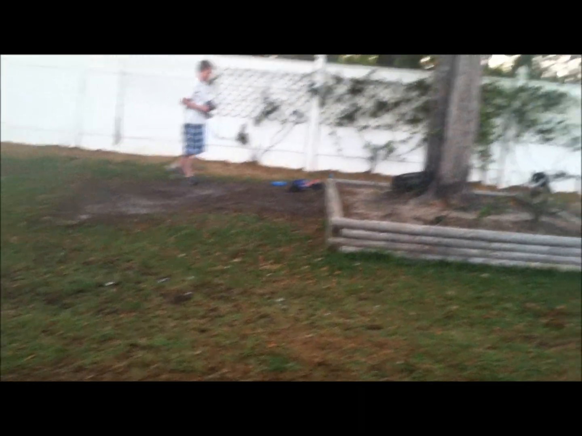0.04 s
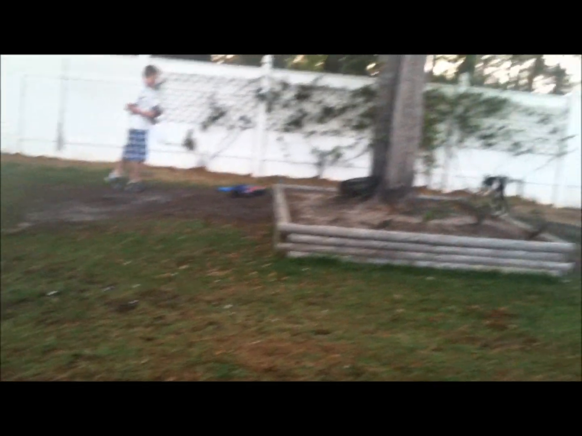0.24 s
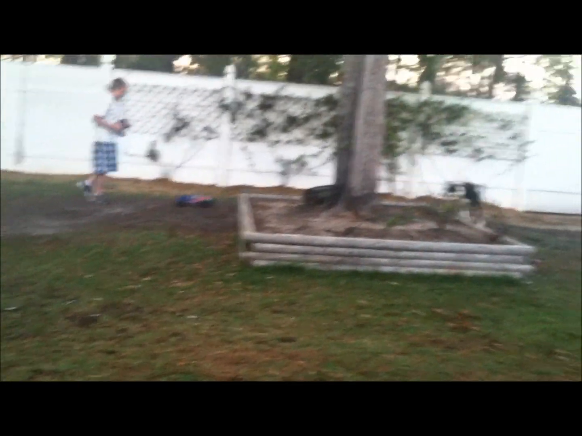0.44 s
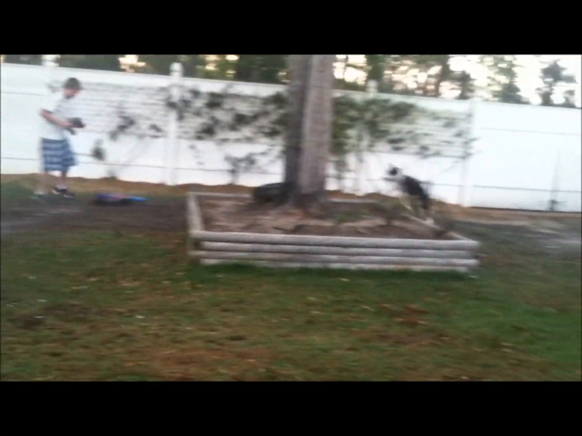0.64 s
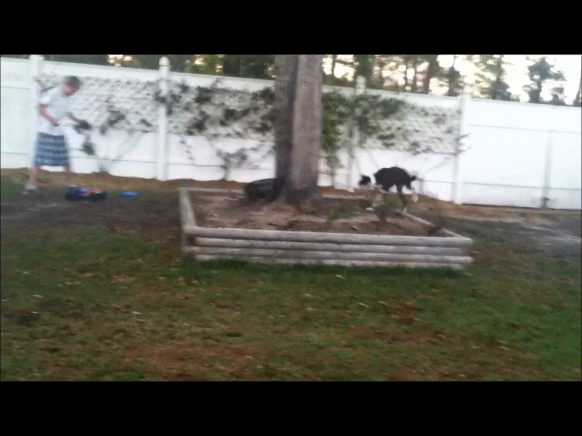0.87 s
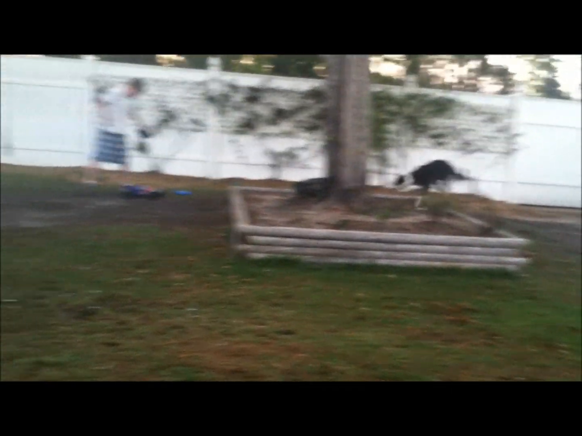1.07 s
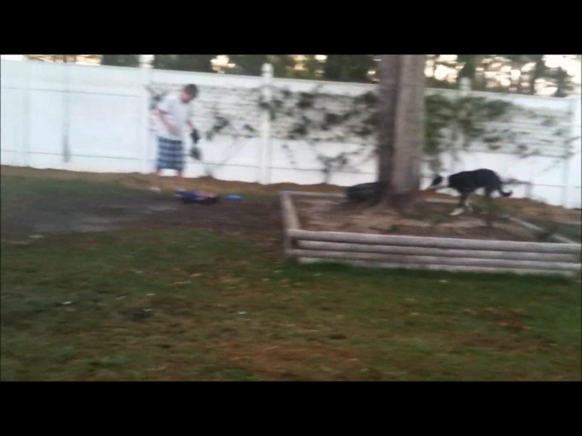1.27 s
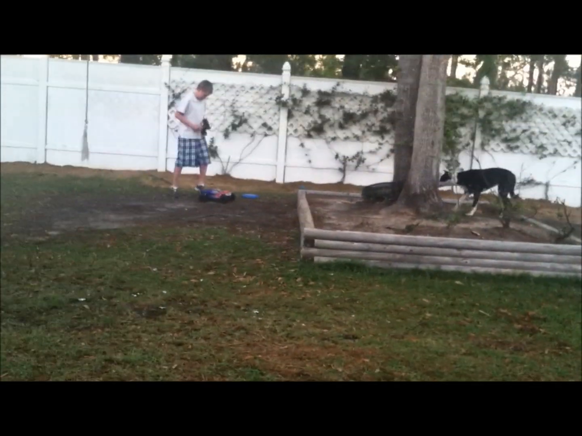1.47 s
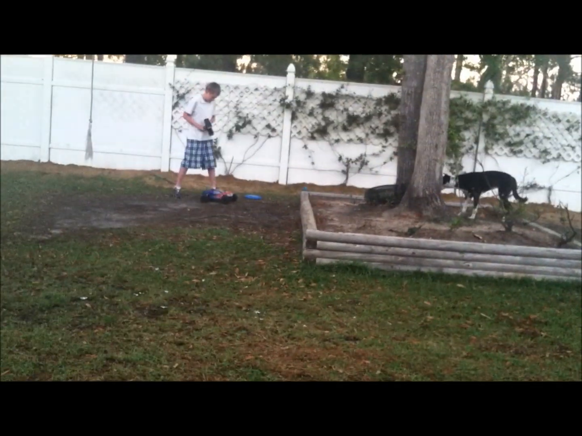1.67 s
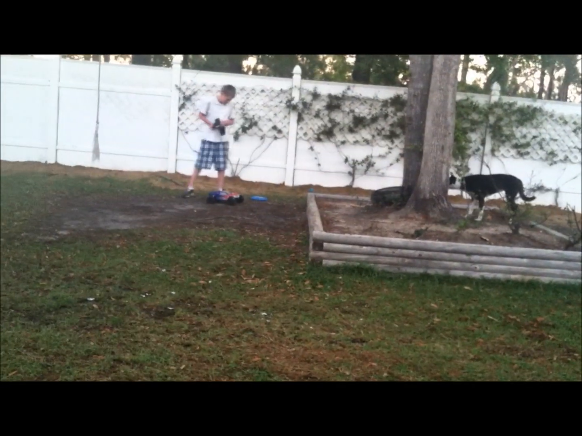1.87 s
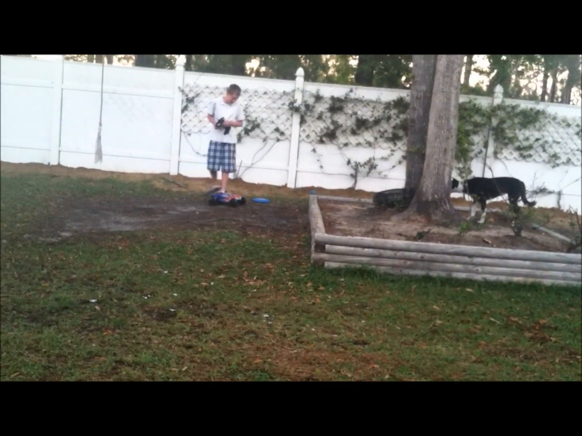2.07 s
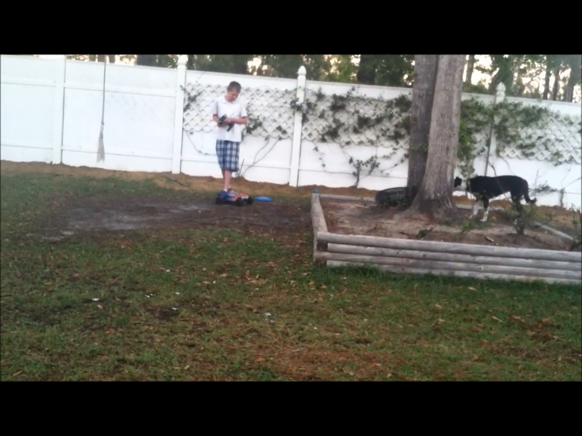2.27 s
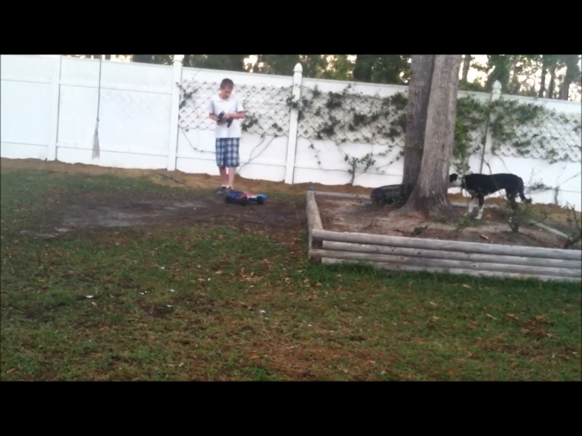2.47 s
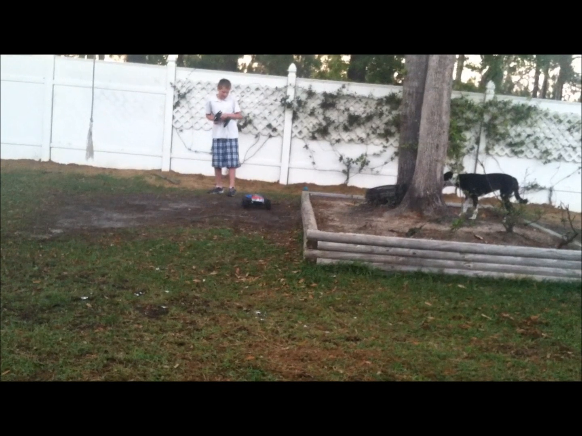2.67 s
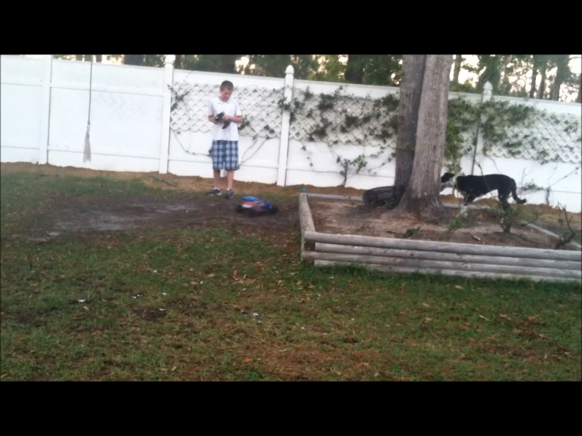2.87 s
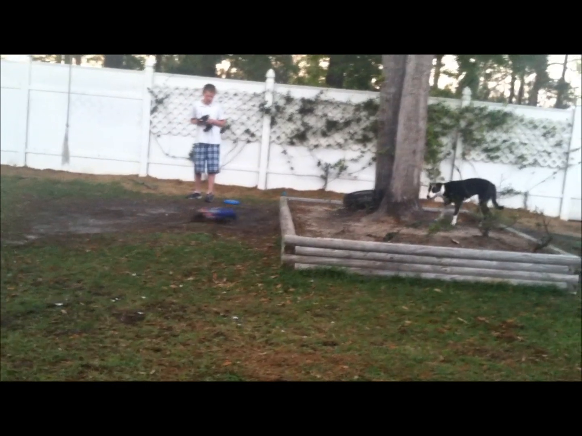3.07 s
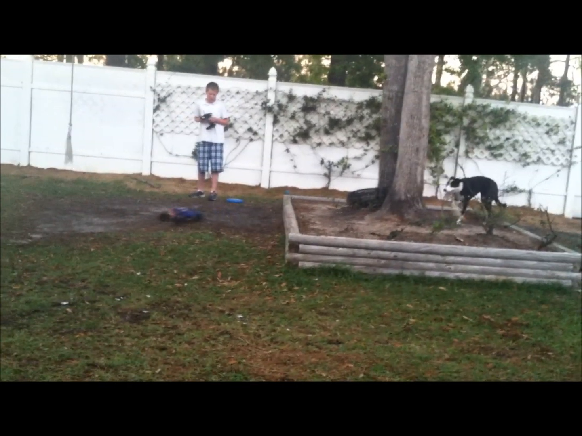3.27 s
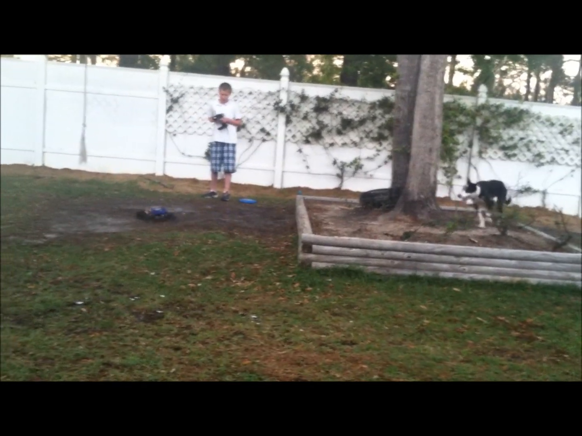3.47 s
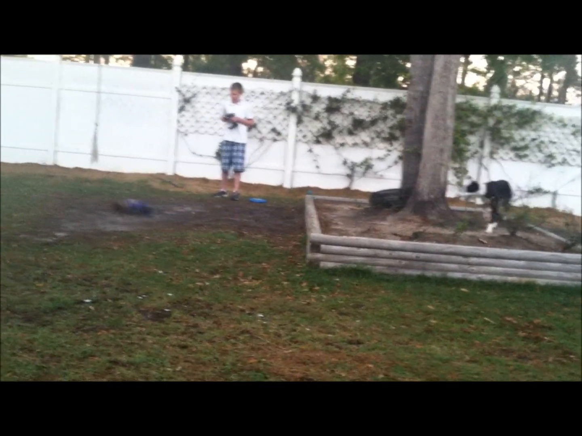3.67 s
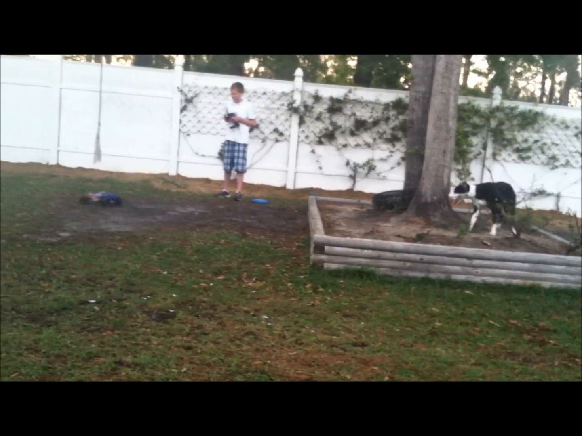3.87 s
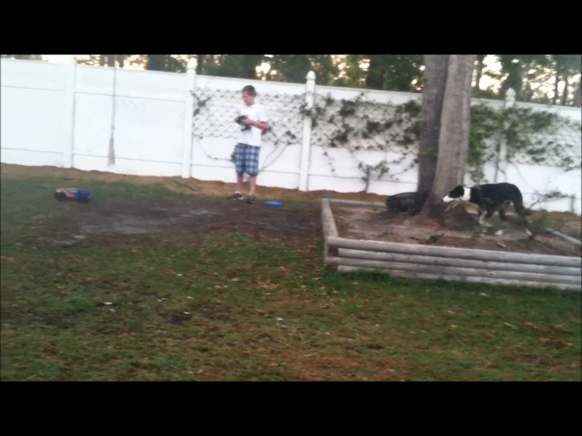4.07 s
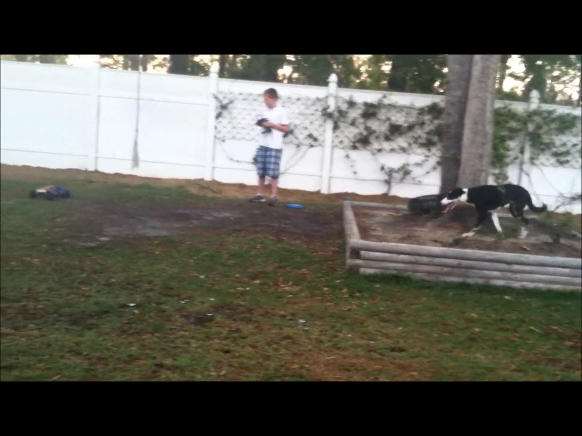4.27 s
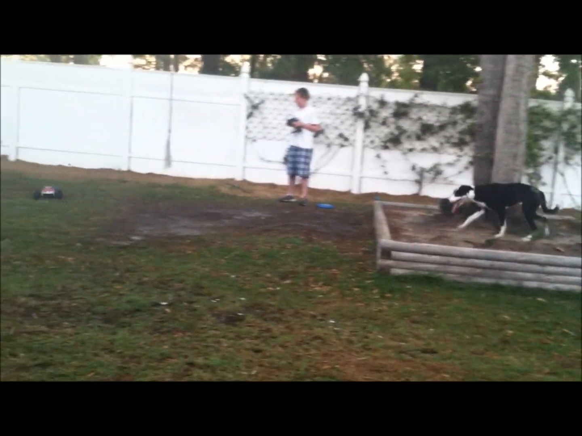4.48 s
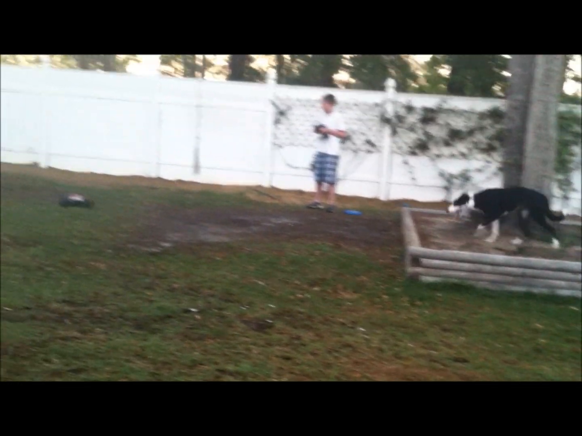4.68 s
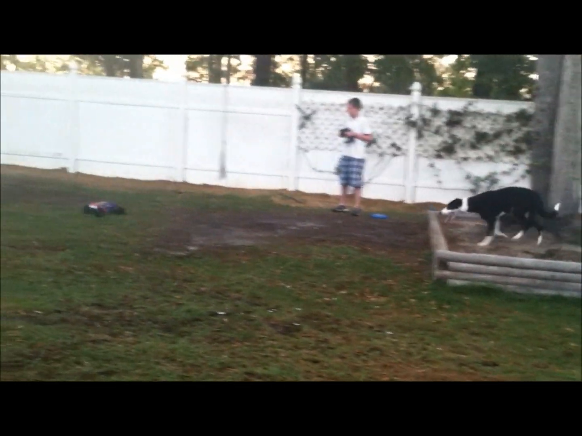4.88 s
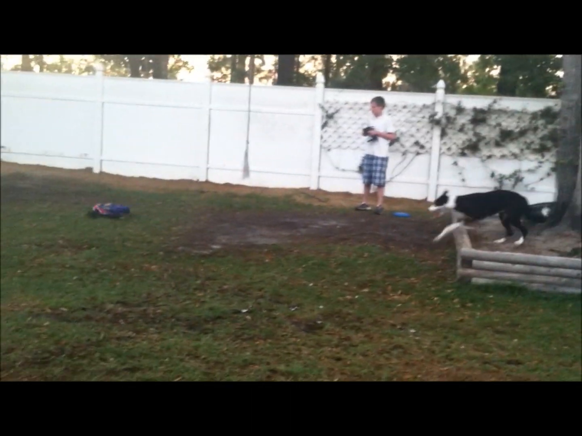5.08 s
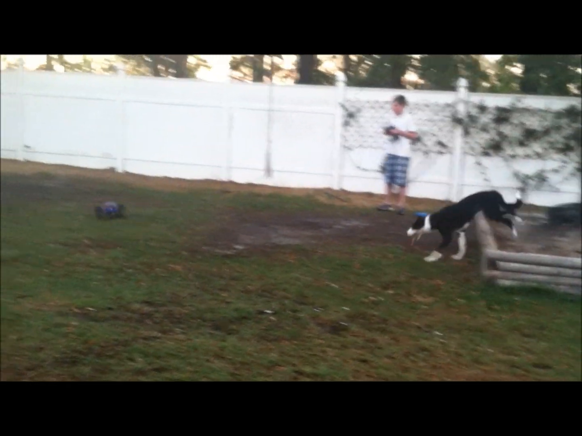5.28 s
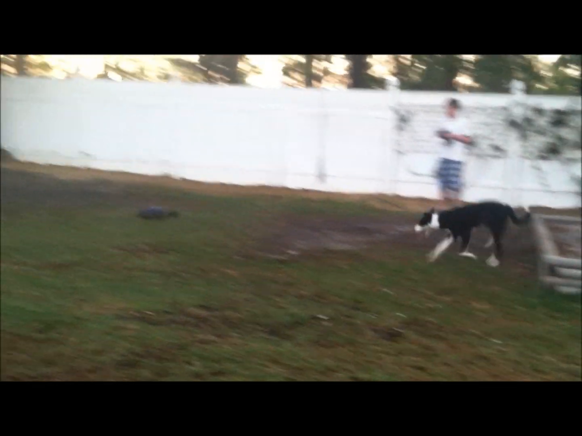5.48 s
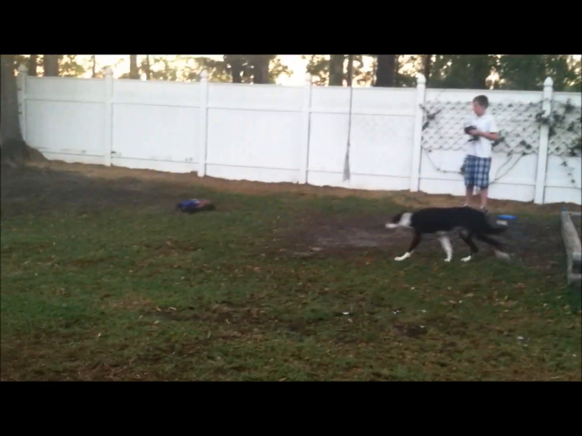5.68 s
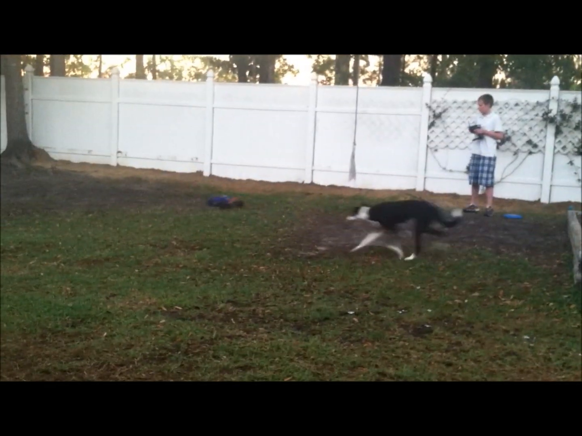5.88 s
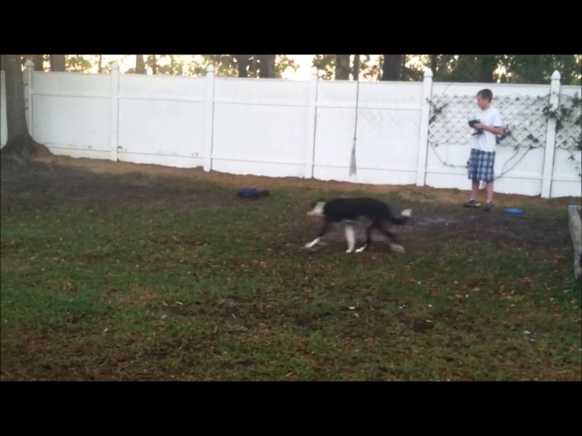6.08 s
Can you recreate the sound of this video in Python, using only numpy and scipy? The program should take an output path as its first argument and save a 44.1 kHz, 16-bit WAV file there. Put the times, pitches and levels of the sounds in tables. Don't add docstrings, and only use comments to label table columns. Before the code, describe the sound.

A toy radio-controlled car drives over turf, heard from a few metres by a single small microphone, centred and dry. Two quick motor bursts come first, rough then higher, followed by about a second of near quiet with soft grass rustles, ticks and distant traffic drone. Then a long gritty run fills the rest: buzzy gear whine, plastic rattle, small thuds and faint squeaks, its hollow tone shifting with each turn, still going at the end.

```python
import sys
import numpy as np
from scipy import signal
from scipy.fft import rfft, irfft
from scipy.io import wavfile

SR = 44100
rng = np.random.default_rng(int(sys.argv[2]) if len(sys.argv) > 2 else 0)


def gain_from_db(level_db):
    decades = np.asarray(level_db, float) / 20
    return 10 ** decades


def inscribe(sig):
    pcm = np.round(np.clip(np.atleast_2d(sig).T, -1, 1) * 32767)
    wavfile.write(sys.argv[1], SR, pcm.astype(np.int16))


N = 270774

# t/s, level/dB
EFFORT = [
    [(0.18, -79), (0.224, -55.5), (0.304, -49), (0.598, -46.5), (0.758, -62), (0.886, -55), (0.92, -56),
     (1.02, -48), (1.27, -76.5)],
    [(2.25, -74), (2.3, -56.5), (2.44, -46.5), (3.11, -45), (3.27, -41), (4.44, -47.5), (4.81, -45),
     (4.89, -48.5), (5.24, -46.5), (5.71, -44.5), (5.79, -47.5), (6.14, -45.5)],
]
# t/s, f/Hz, whine level against effort/dB
SPEED = [
    [(.22, 527, -12), (.38, 600, -1.5), (.55, 685, -3.5), (.66, 665, -1), (.74, 619.5, -27), (.83, 745, 4),
     (.92, 790, 2.5), (1.14, 705, -16)],
    [(2.29, 469, 6), (2.43, 740.7, 6), (2.72, 830, 0), (2.86, 800, 3), (3.0, 905, -2), (3.2, 865, 0.5),
     (3.3, 750, -6.5), (3.39, 880, 2), (3.46, 755, 0.5), (3.62, 740, -1.5), (3.94, 790, -2.5),
     (3.99, 950, 1.5), (4.75, 950, -3.5), (4.82, 865, -1), (5.33, 865, 3), (5.41, 690, -4.5),
     (5.75, 800, -2), (6.14, 850, 0)],
]
# t/s, level/dB
GRIP = [
    [(0.2, -63), (0.396, -50), (0.666, -53), (0.748, -58), (0.992, -47), (1.182, -63), (1.2, -73)],
    [(2.28, -52), (2.29, -58), (2.38, -46.5), (3.12, -46.5), (3.13, -41), (3.89, -48.5), (4.11, -45),
     (5.09, -50), (5.13, -48), (5.49, -50.5), (6.14, -47)],
]
TURN_TIMES = [
    2.04,
    4,
    5.1,
]
# rumble, drum level against grip/dB;
# grind, mesh, hiss level against effort/dB
FACING = [
    (-1, -5.5, 3, -0.5, -0.5),
    (-3.5, -4, -0.5, -2.5, -1),
    (-3, -4.5, -2.5, -3, -3),
    (-2.5, -3.5, -5, -0.6, 0),
]
# level of 1st, 2nd, 3rd, 5th, 10th order against effort/dB
SINGING = [
    (-9, -8.5, -17, -15, -16),
    (-13.5, -5.5, -13, -17.5, -18.5),
    (-11.5, -9, -14, -14, -16.5),
    (-8.5, -16, -16, -12.5, -18.5),
]
# f/Hz, width/Hz, level/dB
SHELL_RINGS = [
    [(271.5, 74, 5.5), (800, 130, -17), (1480, 200, -10), (2046, 95, -5.5), (3140, 300, -6.5),
     (4410, 1150, -6.5), (7700, 1100, -20)],
    [(256.9, 95, -3), (662, 330, -9.5), (1514, 420, -2), (2130, 204, -6.5), (3480, 1240, -6),
     (5280, 64, -8.5), (7130, 1190, -4)],
    [(227, 106, 1), (865, 100, -1), (1530, 870, -8.5), (2780, 140, -32), (3950, 1200, -4.5),
     (5640, 180, -27), (7330, 580, -15)],
    [(270, 113, -7), (855, 80, 1), (1470, 250, -4), (2160, 520, -12), (4350, 670, -10.5), (5200, 370, -17),
     (7260, 1150, -8.5)],
]
# f/Hz, level per Hz/dB
BETWEEN_RINGS = [(59, -35), (100, -23), (247, -3.5), (437, -14), (639, 4), (858, -1), (1130, -18.5),
                 (1680, -10.5), (2570, -15.5), (4260, -5), (5970, -19.5), (7680, -19.5), (9690, -19.5),
                 (13600, -44.5), (15400, -53)]
RANGE_EDGES = [
    450,
    1180,
    2700,
    5900,
]
# multiple, leading SINGING column (0-4), level against it/dB
ORDERS = [(1, 0, -2), (2, 1, 1), (3, 1.5, 2), (4, 1, -6), (5, 3, 3.5), (6, 4.5, -0.5), (7, 3, -2),
          (8, 4, -9), (9, 4, -5.5), (10, 4, 5.5), (11, 4, -11.5)]
# f/Hz, level/dB
RADIATION = [(400, -5.5), (870, 1.5), (1200, -10.5), (1420, 2), (2280, -0.5), (2550, -8), (3500, -2.5),
             (10000, -1.5)]
# lowest f/Hz, highest f/Hz, level against the gear noise/dB
LOOSE_PARTS = [
    (3300, 4800, -4),
    (6270, 8500, -7),
]
# t/s, peak level/dB, ring f/Hz
CHATTER = [(0.3082, -39, 4930), (0.3421, -40, 8300), (0.6664, -42, 7800), (0.9962, -38, 7220),
           (1.025, -40, 8100), (2.4063, -43, 6420), (2.431, -29, 7080), (2.48, -36, 7600),
           (2.5503, -35, 7090), (2.724, -40, 4120), (2.7635, -32.5, 3800), (2.8533, -32, 3800),
           (3.112, -40, 6530), (3.1529, -34, 4260), (3.2385, -29.5, 7480), (3.3754, -32, 6960),
           (3.465, -31, 7700), (3.5106, -38, 6900), (3.9237, -35, 7560), (4.5911, -44, 4450),
           (5.4148, -39, 7030), (5.4592, -39, 4280), (5.5145, -41, 3680), (5.6532, -35, 7330),
           (5.722, -34.5, 4210), (5.9156, -35, 7450), (5.9411, -35, 6700), (6.0009, -37, 7370),
           (6.0922, -32.5, 6670)]
# t/s, peak level/dB, f/Hz
SQUEAKS = [(2.9108, -35.5, 2014), (3.3285, -44, 2130), (3.5698, -41, 2000), (3.7284, -43, 1740),
           (3.7894, -40.5, 2250), (3.9188, -40, 2250), (4.0888, -46, 1930), (5.2494, -50, 2420),
           (5.6095, -46, 1680)]
# t/s, peak level/dB, ring f/Hz
BUMPS = [(2.596, -42, 840), (2.835, -29.5, 650), (3.126, -30, 670), (3.223, -31.5, 260), (3.378, -32, 774),
         (3.467, -33, 610), (3.585, -32, 670), (4.124, -30.5, 912), (4.276, -32, 249), (4.684, -34, 266),
         (4.794, -29.5, 650), (5.014, -40, 852), (5.317, -46, 890), (5.988, -33, 295)]
# t/s, peak level/dB, centre f/Hz
TICKS = [(0.022, -50, 6460), (0.2124, -50, 7200), (0.2265, -46, 6830), (0.2314, -47, 7670),
         (0.2374, -53, 7050), (0.7826, -54, 6920), (0.7941, -45, 7640), (1.3914, -47.5, 6900),
         (1.4506, -50, 7100), (1.924, -57, 6700), (1.9344, -63, 5200), (2.2817, -51, 7700),
         (4.5385, -39, 5670)]
# t/s, level/dB
PAW_STEPS = [
    (0.028, -67),
    (0.146, -65),
    (1.4, -66),
    (1.93, -71),
    (2.15, -67),
]
# f/Hz, level per Hz/dB
ROAD_COLOUR = [(20, -38), (50, -27), (80, -18), (130, -6), (230, -3), (400, -12.5), (620, -3), (800, -0.5),
               (1250, -3.5), (1650, -8.5), (2500, -24), (4500, -32), (8000, -34), (10500, -43.5),
               (15500, -40)]
# t/s, level/dB
ROAD_LEVEL = [
    (0.0, -49),
    (6.14, -51),
]


def car():
    rumble, drum, grind, mesh, hiss = shell()
    grip_db, = in_time(GRIP, rest=(-80,))
    effort_db, = in_time(EFFORT, rest=(-90,))
    tooth_hz, press_db = in_time(SPEED, rest=(520, 0))
    tooth_hz = tooth_hz * (1 + 0.009 * drift(45.0))
    share = headings()
    facing = np.transpose(FACING) @ share
    rumble_db, drum_db = grip_db + facing[:2]
    grind_db, mesh_db, hiss_db = effort_db + facing[2:]

    lift_db = np.minimum(-46 - effort_db, 16.0)
    grind_db = grind_db + (1 - 0.67) * lift_db
    lead_db = [effort_db + press_db + db + 3.5 * drift(14.0) for db in np.transpose(SINGING) @ share]
    lead_db[:3] = [db + (1 - 0.38) * lift_db for db in lead_db[:3]]

    beat = throb(tooth_hz)
    shake = slack_swell(fall_s=0.0012)
    shake *= np.clip((800 - tooth_hz) / 150, .25, 1)
    (low, high, db), (hiss_low, hiss_high, hiss_rattle_db) = LOOSE_PARTS
    mesh = mesh + gain_from_db(db) * rattle(low, high, per_s=160.0, ring_s=0.0022)
    hiss = hiss + gain_from_db(hiss_rattle_db) * rattle(hiss_low, hiss_high, per_s=160.0, ring_s=0.0022)

    tyres = gain_from_db(rumble_db + 1.8 * drift(6.0)) * rumble
    tyres += gain_from_db(drum_db + 1.1 * drift(20.0)) * drum
    gears = gain_from_db(grind_db - 4.0 + 0.97 * beat) * grind
    gears += gain_from_db(mesh_db - 5.0 + 0.87 * beat + 2.0 * shake + 1.0 * drift(24.0)) * mesh
    gears += gain_from_db(hiss_db - 4 + 0.95 * beat + 6.5 * shake + 0.84 * drift(15.0)) * hiss
    return tyres + gears + gain_from_db(0.3 * beat - 2.2) * whine(tooth_hz, lead_db, beat)


def shell():
    out, share = 0, headings()
    grit = tooth_grit(per_s=4000, spread_db=4.5)
    other_grit = tooth_grit(per_s=4000, spread_db=2.5)
    broad = gain_from_db(-3) * colour(other_grit, BETWEEN_RINGS)
    for k, modes in enumerate(SHELL_RINGS):
        rings = 0
        for j, (hz, width, db) in enumerate(modes):
            ring = resonate(resonate(grit, hz, 1.43 * width), hz, 1.43 * width)
            rings = rings + (-1) ** j * gain_from_db(db) * ring
        out = out + np.sqrt(share[k]) * split(broad + rings)
    return out


def tooth_grit(per_s, spread_db):
    sizes = gain_from_db(spread_db * np.minimum(rng.exponential(1, N), 5)) * rng.choice([-1, 1], N)
    contacts = rms_one(sizes * (rng.random(N) < per_s / SR))
    return rms_one(contacts * .5 + rng.standard_normal(N))


def headings():
    t = np.arange(N) / SR
    turned = [np.clip((t - s) / 0.059 + .5, 0, 1) for s in TURN_TIMES]
    passed = [1 + 0 * t] + turned + [0 * t]
    return np.clip(-np.diff(passed, axis=0), 0, 1)


def whine(tooth_hz, lead_db, beat):
    flutter = 1 + .012 * drift(30.4) + 0.00624 * beat
    turn = 2 * np.pi * np.cumsum(tooth_hz * flutter) / SR
    out = 0
    for order, lead, db in ORDERS:
        waver = 14.0 + 34.0 * order
        tone = (1.47 + drift(waver)) * np.cos(round(order) * turn)
        tone += drift(waver) * np.sin(round(order) * turn)
        level_db = lead_db[round(lead)] + db + radiated(order * tooth_hz) + 1.04 * drift(10.0)
        out = out + gain_from_db(level_db) * tone
    return out


def radiated(hz):
    at, level = np.transpose(RADIATION)
    return np.interp(np.log(hz), np.log(at), level)


def throb(tooth_hz):
    turn = 2 * np.pi * np.cumsum(tooth_hz / 18) / SR + 1.0 * drift(10.45)
    return np.cos(turn) * (1 + 0.47 * drift(10.4)) + 0.594 * drift(64.0)


def rattle(low_hz, high_hz, per_s, ring_s):
    sizes = gain_from_db(2.4 * np.minimum(rng.exponential(1, N), 4))
    knocked = sizes * (rng.random(N) < per_s / SR)
    dealt = rng.integers(0, 14, N)
    width = 1 / (np.pi * ring_s)
    out = 0
    for k, hz in enumerate(np.geomspace(low_hz, high_hz, 14)):
        hits = knocked * (dealt == k) + 1e-18
        out = out + resonate(resonate(hits, hz, width), hz, width)
    return rms_one(out)


def slack_teeth():
    start_s, period_s, level_db, rings_hz = .3734, 0.027, -40, [7870, 8550, 3110]
    regular = [(start_s + k * period_s, level_db, rings_hz[k % 3]) for k in range(10)]
    return regular + list(CHATTER)


def slack_swell(fall_s):
    t, marks = np.arange(round(.03 * SR)) / SR, np.zeros(N)
    marks[[round((s - .002) * SR) for s, db, hz in slack_teeth()]] = 1
    return signal.fftconvolve(marks, t / fall_s * np.exp(1 - t / fall_s))[:N]


def gear_chatter():
    return knocks(slack_teeth(), rise_s=0.0017, fall_s=0.0053, sharp=82.0, puff=0.11, gain_db=-3.0)


def axle_squeaks():
    return knocks(SQUEAKS, rise_s=0.0059, fall_s=0.021, sharp=26.0, puff=.05, gain_db=3.5)


def wheel_bumps():
    return knocks(BUMPS, rise_s=0.00423, fall_s=0.021, sharp=4.8, puff=.12, gain_db=-6)


def grass_ticks():
    return knocks(TICKS, rise_s=0.00021, fall_s=0.0005, sharp=3.0, puff=0.99, gain_db=-3.5)


def knocks(events, rise_s, fall_s, sharp, puff, gain_db):
    out, t = np.zeros(N), np.arange(round(8 * fall_s * SR) + 64) / SR
    shape = (1 - np.exp(-t / rise_s)) * np.exp(-t / fall_s)
    for s, db, hz in events:
        burst = shape * rng.standard_normal(len(t))
        ring = resonate(resonate(burst, hz, hz / sharp), hz, hz * .5)
        bare = resonate(resonate(burst, hz, hz * 0.28), hz, hz * 0.54)
        one = ring / np.abs(ring).max() + puff * bare / np.abs(bare).max()
        at = max(round((s - rise_s) * SR), 0)
        out[at:at + len(t)] += gain_from_db(db + gain_db) * one[:N - at]
    return out


def grass_rustle():
    t = np.arange(N) / SR
    steps = [db - np.maximum(350 * (s - t), 150 * (t - s)) for s, db in PAW_STEPS]
    level_db = np.maximum(np.max(steps, axis=0), -78)
    crackle = rms_one(resonate(tooth_grit(per_s=900, spread_db=-10.0), 5100, 4000))
    return gain_from_db(level_db - 2.5) * crackle


def far_road():
    level_db, = in_time([ROAD_LEVEL], rest=(-50,))
    drone = rms_one(colour(rng.standard_normal(N), ROAD_COLOUR))
    return gain_from_db(level_db + 0.35 * drift(10.0)) * drone


def rms_one(x):
    return x / np.sqrt(np.mean(x ** 2) + 1e-20)


def in_time(spans, rest):
    rows = []
    for span in spans:
        rows += [(span[0][0] - .03, *rest), *span, (span[-1][0] + 0.0403, *rest)]
    s, *columns = np.transpose(rows)
    return [np.interp(np.arange(N) / SR, s, c) for c in columns]


def drift(rate):
    r = np.exp(-2 * np.pi * rate / SR)
    wander = signal.lfilter([1], [1, -2 * r, r * r], rng.standard_normal(N + SR))
    return rms_one(wander[SR:])


def colour(x, points):
    hz, level = np.transpose(points)
    at = np.log(np.arange(N // 2 + 1) * SR / N + 1)
    return irfft(rfft(x) * gain_from_db(np.interp(at, np.log(hz), level)), N)


def resonate(x, hz, width):
    r = np.exp(-np.pi * width / SR)
    feedback = [1, -2 * r * np.cos(2 * np.pi * hz / SR), r * r]
    return signal.lfilter(np.array([1, 0, -1]) * (1 - r * r) / 2, feedback, x)


def split(x):
    hz, spectrum = np.arange(N // 2 + 1) * SR / N, rfft(x)
    soft_edges = [1 / (1 + (hz / edge) ** 12) for edge in RANGE_EDGES]
    below = [0 * hz] + soft_edges + [1 + 0 * hz]
    return np.array([rms_one(irfft(spectrum * (b - a), N)) for a, b in zip(below, below[1:])])


def scene():
    toy = car() + gear_chatter() + axle_squeaks() + wheel_bumps()
    yard = grass_ticks() + grass_rustle() + far_road()
    return np.tile(toy + yard, (2, 1))


def roll_off(x):
    return signal.sosfilt(signal.butter(12, 15600, fs=SR, output="sos"), x)


def record(dry):
    heard = signal.sosfilt(signal.butter(2, 12500, fs=SR, output="sos"), dry)
    return roll_off(heard)


dry = scene()
out = record(dry)
inscribe(out)
```